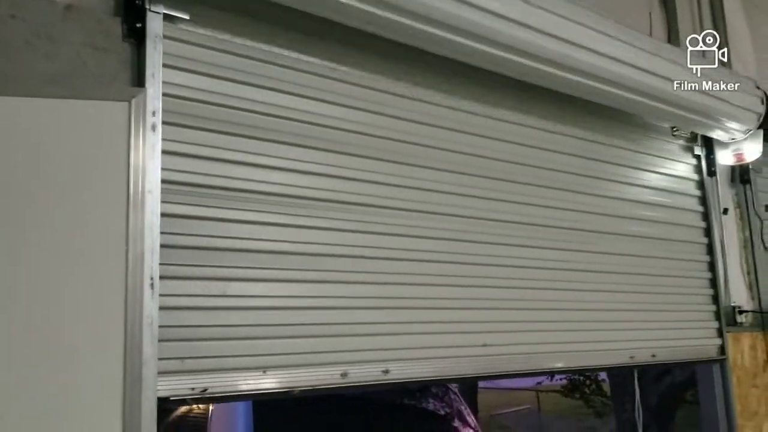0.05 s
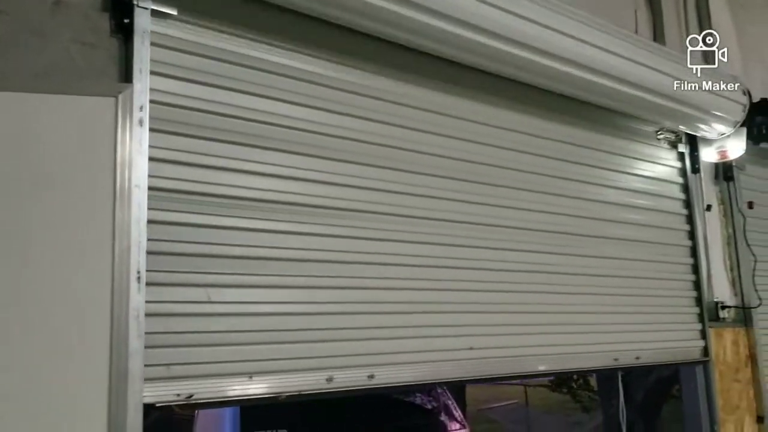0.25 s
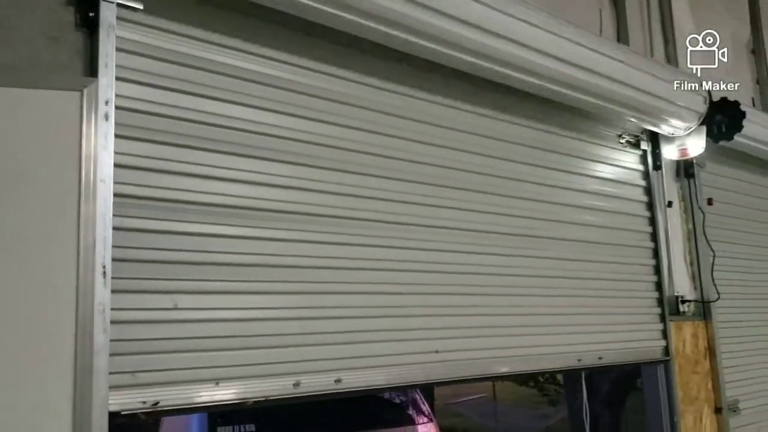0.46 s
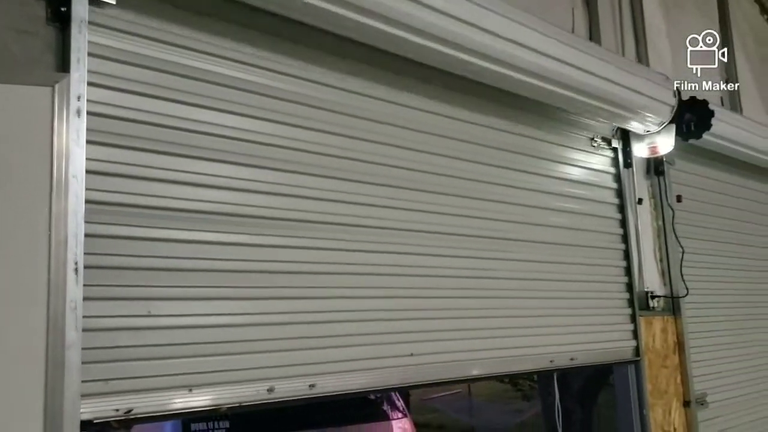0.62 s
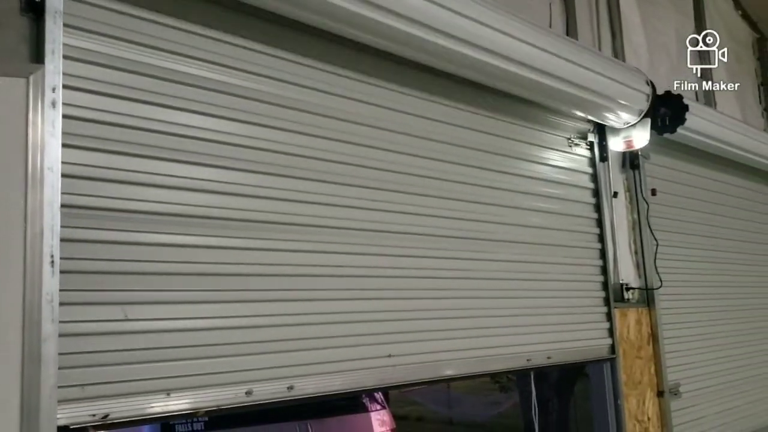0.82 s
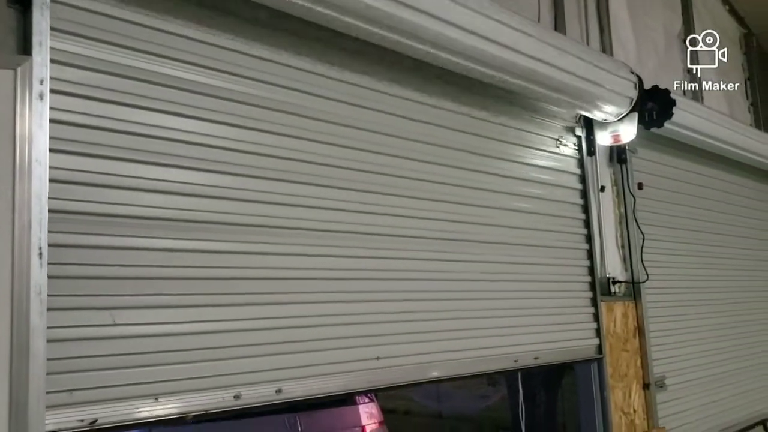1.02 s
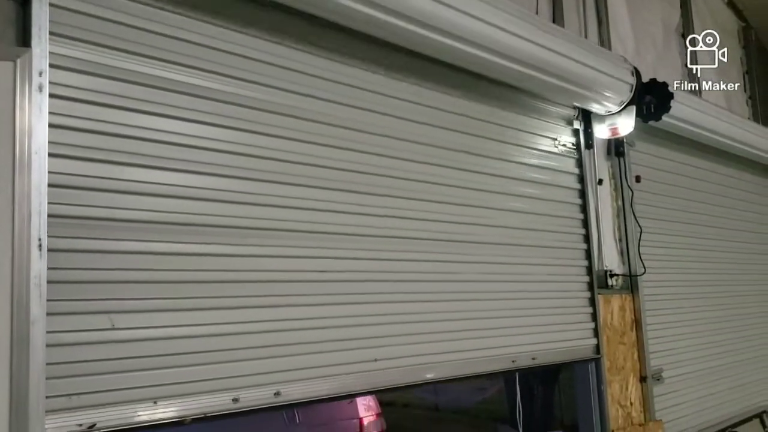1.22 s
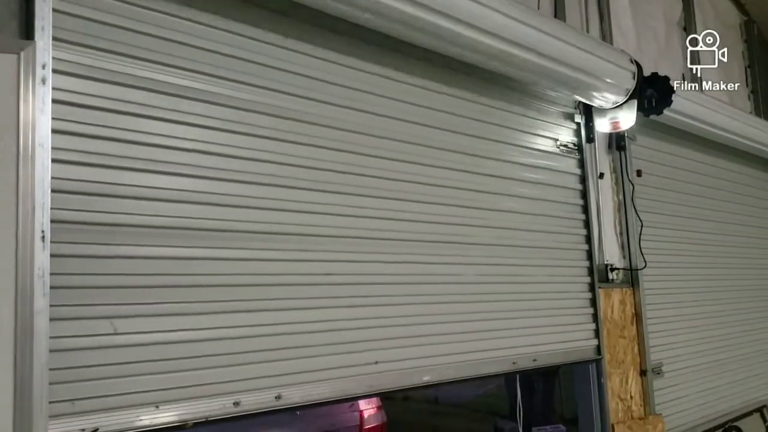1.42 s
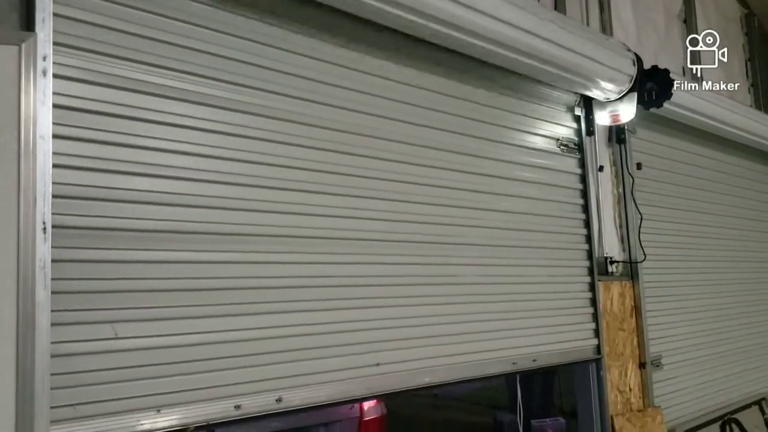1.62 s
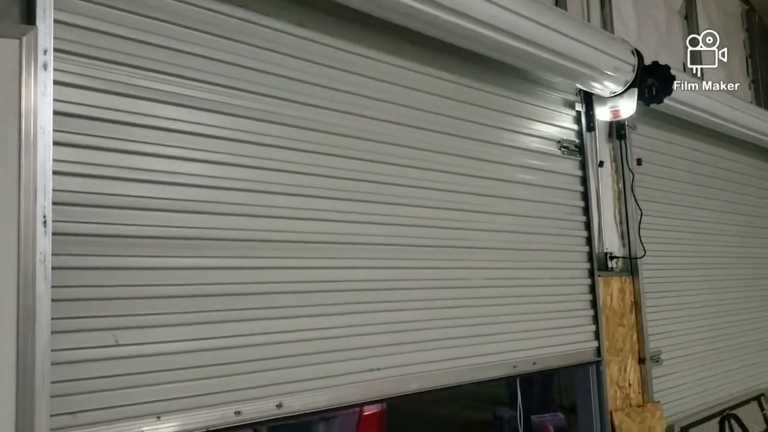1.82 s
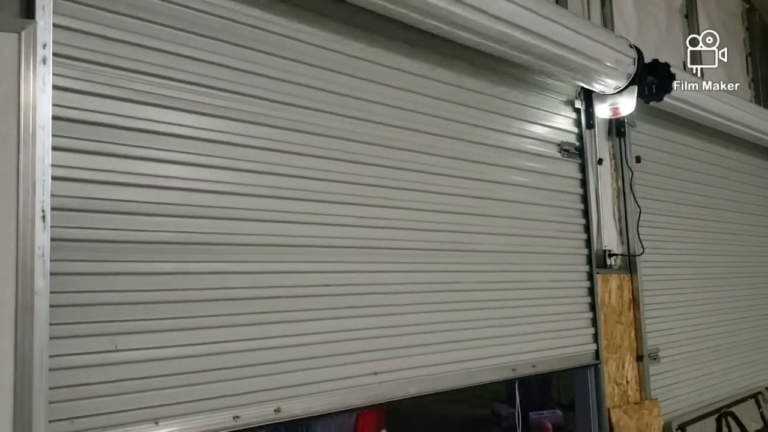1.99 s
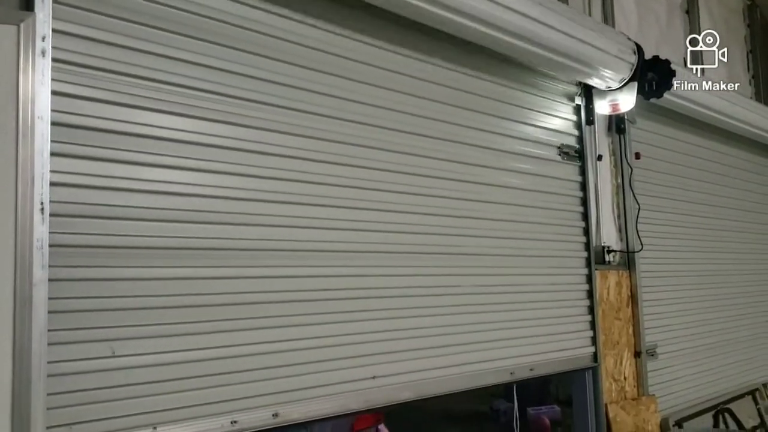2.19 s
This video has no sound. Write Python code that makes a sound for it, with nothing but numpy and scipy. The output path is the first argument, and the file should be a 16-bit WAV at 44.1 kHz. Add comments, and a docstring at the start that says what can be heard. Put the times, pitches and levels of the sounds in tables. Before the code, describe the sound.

A motorised steel roll-up door winds down in an echoing metal garage, a few metres away. The motor hums and rumbles from the start. At about 0.3 seconds the door jerks free with a thump, crash and clang. The slats then knock and rattle while the sheet booms, loudest around 0.5 seconds, with a very faint scrape and squeaks. From about 2 seconds the rattle dies away.

```python
"""A motor winds a steel roll-up door down in a metal garage, heard from a few metres inside.
First the drive hums and rumbles. With a knock and a thump the curtain of slats jerks free and
crashes, and its bottom bar clangs. Then the slats knock and rattle in their guides while the
whole sheet booms, with a faint scrape and a few squeaks. Near the end the rattle dies away
and the hall rings with it."""
import sys
import numpy as np
from scipy import signal
from scipy.fft import rfft, irfft
from scipy.io import wavfile
from scipy.ndimage import uniform_filter1d

SR = 44100
rng = np.random.default_rng(int(sys.argv[2]) if len(sys.argv) > 2 else 0)


def waveform_to_disk(signal):
    """Save audio, clipped to [-1, 1], as 16-bit WAV at the path in sys.argv[1]."""
    frames = np.transpose(np.atleast_2d(signal))
    scaled = np.clip(frames, -1, 1) * 32767
    samples = np.round(scaled).astype(np.int16)
    wavfile.write(sys.argv[1], SR, samples)


N = 103635

# hum of the motor: t/s, f/Hz, level/dB
MOTOR_HUM = [(0, 131.2, -54), (.17, 129.6, -50), (.26, 126.7, -47.5), (.7, 120, -45), (1.0, 149.3, -44.5),
             (1.5, 154, -52.5), (2.0, 151.4, -46), (2.15, 150.2, -50), (2.35, 147.5, -80)]
# how hard the moving curtain shakes: t/s, relative rattle level/dB, relative rumble level/dB
SHAKING = [(0, -46.5, -14.5), (.26, -41, -6), (.285, -4.5, -4.5), (.46, 0.5, 2), (.55, 6, 1.5), (.68, 2, 5),
           (.8, 2, 0.5), (1.03, -1, 1), (1.2, 4, -2), (1.55, -0.5, 2), (1.75, -4, -0.5), (1.87, -2, 0.5),
           (2.08, -10.5, -4), (2.16, -21, -6), (2.35, -28.5, -11)]
# tone colour (how strong each frequency is) of the rumbling drum: f/Hz, relative level/dB
RUMBLE_COLOUR = [(20, -22), (32, -18), (52, -1.5), (59, -8.5), (73, -4.5), (90, -2.5), (120, 1.5),
                 (160, -0.5), (230, -13), (400, -25.5), (900, -42.5), (4000, -83)]
# tone colour of the whirring gears: f/Hz, relative level/dB
WHIRR_COLOUR = [(60, -9.5), (200, 8.5), (380, 1), (500, 5.5), (620, 0), (1000, -3), (1300, -20.5),
                (2000, -27.5), (2800, -36.5), (16000, -73.5)]
# slats knocking against the guides: t/s, relative level/dB
KNOCKS = [(0.182, -23), (.263, 1), (0.28, 5), (0.31, 3), (.324, 3.5), (.357, -0.5), (.388, 0), (.42, -4),
          (.497, 2), (.512, -1), (.529, 4), (.546, -2), (.572, -5.5), (.612, -8), (.659, -7), (.678, -8.5),
          (.722, 1.5), (.744, 2), (.763, -2.5), (.795, -1), (0.894, 2.5), (.925, 0.5), (.958, -4),
          (.985, -8), (1.064, -3), (1.101, 2.5), (1.138, -5), (1.172, -1.5), (1.202, -3), (1.253, 1.5),
          (1.301, -6), (1.358, -8.5), (1.43, 5), (1.439, 0.5), (1.494, 2), (1.518, -5), (1.579, -3.5),
          (1.596, -3), (1.646, -4), (1.686, -4), (1.771, -2.5), (1.834, -3.5), (1.846, -4.5), (1.857, 0.5),
          (1.873, -8), (1.945, -8), (2.018, -7.5), (2.046, -10.5), (2.21, -12.5), (2.302, -13.5),
          (2.324, -13)]
# tone colour of a knock: f/Hz, relative level/dB
KNOCK_COLOUR = [(60, -29.5), (130, -0.5), (200, 4.5), (280, 0), (480, 0.5), (700, -2), (950, -3.5),
                (1400, -12), (1800, -19), (2250, -27.5), (2750, -49), (3700, -50), (4800, -63),
                (16000, -80.5)]
# tones at which the steel slats ring: f/Hz, width/Hz, relative level/dB
SLAT_TONES = [(333, 16, -2), (415, 14, -2), (472, 22, -3), (548, 20, -5), (653, 22, -2), (741, 22, -5),
              (917, 30, -3), (1090, 26, -6), (1392, 40, -4), (1581, 36, -4), (1935, 50, -8), (2259, 24, -4)]
# thumps of the bending sheet: t/s, relative level/dB, main tone f/Hz
THUMPS = [(0.184, -4.5, 139.6), (0.265, 1.5, 155.5), (0.284, 6, 157.4), (0.318, 8.5, 150.2),
          (0.358, 3, 162.9), (0.405, -1, 133), (0.517, 1, 162), (0.574, -4.5, 124.6), (.625, -3.5, 130),
          (0.663, -3.5, 119.9), (.722, 2, 150.8), (.750, 4.5, 150.8), (.776, 0.5, 153),
          (0.813, -3.5, 153.5), (0.896, -1, 146.8), (0.959, -6, 161.6), (1.136, -8, 155.7),
          (1.254, 1.5, 155.7), (1.304, -4, 153.6), (1.448, -1.5, 153.1), (1.505, 1.5, 160),
          (1.525, 0.5, 158), (1.604, -5.5, 150.8), (1.688, -2, 169.3), (1.716, -5.5, 163.5),
          (1.782, -5, 159.5), (1.855, -1, 164.2), (1.878, -7.5, 155), (1.95, -2.5, 155.2),
          (2.017, -10, 157.2), (2.326, -6.5, 144.7)]
# tones of the sheet: ratio to the main tone, time to fade by 60 dB/s, relative level/dB
SHEET_TONES = [(0.482, 0.28, -22), (.79, 0.12, -8.5), (1, 0.13, 2.5), (1.3, 0.18, -4.5)]
# the bottom bar hitting the guides: t/s, relative level/dB, contact time/s
CLANGS = [(0.2611, -2, .0004), (.526, -5.5, 0.0013), (1.849, -8, 0.0011)]
# tones of the bottom bar: f/Hz, time to fade by 60 dB/s, relative level/dB
BAR_TONES = [(206, 0.28, -1), (337, 0.22, -5), (463.8, 0.24, -6.5), (654, 0.14, -6.5), (900.5, 0.063, 2),
             (985, 0.044, -1)]
# blows as the curtain jerks free: t/s, relative level/dB
JERK_BLOWS = [(.2615, 1.5), (.277, -1.5), (.300, -5.5), (.317, -1.5), (.329, 1.5)]
# tone colour of that crash: f/Hz, relative level/dB
CRASH_COLOUR = [(60, -32), (300, 4), (600, -3), (950, -1), (1300, -6), (1700, -8.5), (2050, -12.5),
                (2400, -21.5), (2800, -29), (3900, -36.5), (4600, -50.5), (16000, -79)]
# tone colour of the rattling slats: f/Hz, relative level/dB
RATTLE_COLOUR = [(60, -15.5), (130, 3), (200, 10.5), (280, 6), (480, 6.5), (700, -2.5), (1000, 0),
                 (1400, -11.5), (1800, -16.5), (2250, -26.5), (2750, -70.5), (3700, -55.5), (5000, -60),
                 (16000, -75.5)]
# a slat scraping in its guide: t/s, level/dB
SCRAPE_LEVELS = [(.6, -125), (.68, -86), (.77, -84), (.84, -110), (1.05, -99.5), (1.3, -100.5), (1.4, -120)]
# tone colour of the scrape: f/Hz, relative level/dB
SCRAPE_COLOUR = [(2000, -29), (3300, 3), (3900, 2.5), (4400, -6), (5500, -1), (7500, -25), (16000, -24.5)]
# squeaks of the curtain: middle t/s, half length/s, f/Hz, level before the echoes/dB
SQUEAKS = [(1.05, .07, 3900, -104), (1.26, .1, 3840, -99), (2.22, .08, 1787, -89.5)]
# stereo width, what differs between the ears against what they share: f/Hz, relative level/dB
STEREO_WIDTH = [(30, -14), (70, -18), (150, -20), (260, -11.5), (500, -6), (1000, 2.5), (16000, 1.5)]
# tone colour of the steady hiss: f/Hz, relative level/dB
HISS_COLOUR = [(1000, 2), (3800, -3), (5000, -6), (7000, -11.5), (8800, -13), (10500, -7), (12000, -1),
               (15500, -1.5)]

PLACES = 6  # spots on the curtain that knock and rattle
FILTER_SIZE, ECHO_SIZE = 8192, 32768  # samples


def undb(db):
    """Turn decibels into a factor to multiply by."""
    return 10 ** (np.asarray(db) / 20)


def level(x, db):
    """Scale a sound to an average (rms) level."""
    return x * undb(db) / np.sqrt(np.mean(x ** 2))


def fade(t, t60):
    """A fade that falls by 60 dB every t60 seconds."""
    return np.exp(-np.log(1000) * t / t60)


def pan(x, right_db):
    """Make the right side right_db louder than the left."""
    return x * undb(np.array([[-right_db], [right_db]]) / 2)


def curve(table, column):
    """One column of a table, joined by straight lines in time."""
    rows = np.array(table)
    return np.interp(np.arange(N) / SR, rows[:, 0], rows[:, column])


def gains(points):
    """Join (Hz, dB) points into a gain for every frequency of a filter."""
    hz, db = np.array(points).T
    filter_hz = np.arange(FILTER_SIZE // 2 + 1) * SR / FILTER_SIZE
    return undb(np.interp(np.log(filter_hz + 1), np.log(hz), db))


def convolve(x, response):
    """Play a sound through a filter or room, given its response to one click."""
    return signal.fftconvolve(np.atleast_2d(x), np.atleast_2d(response), axes=-1)[:, :x.shape[-1]]


def shape(x, gain):
    """Filter with the given gains, ringing only after a sound and never before it."""
    one_sided = np.r_[1, np.full(FILTER_SIZE // 2 - 1, 2), np.zeros(FILTER_SIZE // 2)]
    log_spectrum = rfft(irfft(np.log(gain)) * one_sided)
    return convolve(x, irfft(np.exp(log_spectrum)))


def colour(x, points):
    """Give a sound a tone colour of (Hz, dB) points."""
    return shape(x, gains(points))


def wander(rate_hz):
    """A smooth random wobble, about 1 in size."""
    step = int(SR / rate_hz)
    held = np.repeat(rng.standard_normal(200), step)[:N]
    return level(uniform_filter1d(uniform_filter1d(held, step), step), 0)


def wide_noise(size=N):
    """Stereo noise, alike at both ears in the bass and different in the treble."""
    width = gains(STEREO_WIDTH)
    mid, side = (shape(rng.standard_normal(size), share / np.hypot(1, width)) for share in (1, width))
    return np.vstack([mid + side, mid - side])


def hall(splits_hz=(1200, 2700), t60s=(0.63, 0.76, 0.58), build_s=0.0015, early_db=3.5, early_s=0.013):
    """Echoes of the metal garage: strong first echoes, then a tail whose top band dies first."""
    t, noise = np.arange(ECHO_SIZE) / SR, rfft(wide_noise(ECHO_SIZE))
    band = np.digitize(np.arange(noise.shape[1]) * SR / ECHO_SIZE, splits_hz)
    tail = sum(irfft(noise * (band == k)) * fade(t, t60) for k, t60 in enumerate(t60s))
    build_up = 1 - np.exp(-t / build_s)
    early = 1 + undb(early_db) * np.exp(-t / early_s)  # off the door and the nearest wall
    return level(tail * build_up * early, 0) / np.sqrt(ECHO_SIZE)


def drive(shaft_db=-54, waver_db=-2.5):
    """The drum rumbles, the gears whirr, and the motor hums over a shaft tone an octave below."""
    hum_hz = curve(MOTOR_HUM, 1) * (1 + 0.014 * wander(14.49))
    shaft_angle = np.pi * np.cumsum(hum_hz) / SR
    hum = undb(curve(MOTOR_HUM, 2) + waver_db * wander(4.3)) * np.sin(2 * shaft_angle)
    shaft = undb(shaft_db + waver_db * wander(27)) * np.sin(shaft_angle)
    drum = level(colour(wide_noise(), RUMBLE_COLOUR) * undb(curve(SHAKING, 2)), db=-42.5)
    gears = level(colour(wide_noise(), WHIRR_COLOUR), db=-58.5)
    return np.sqrt(2) * (hum + shaft) + drum + gears


def blows(rows, chatter_s, click, chatter_db=-5, rise_s=0.0017):
    """The force of each blow: a click, then a short chatter of the slats next to it."""
    force, t = np.zeros(N), np.arange(SR // 5) / SR
    chatter_size = undb(chatter_db) * np.exp(-t / chatter_s) * (1 - np.exp(-t / rise_s))
    for at, db in rows:
        blow = chatter_size * rng.standard_normal(len(t))
        blow[0] += click
        cutoff_hz = np.clip(3000 * undb(db) ** 0.93, 500, SR / 4)  # gentle blows are duller
        blow = signal.lfilter(*signal.butter(1, cutoff_hz, fs=SR), blow)
        start = int(at * SR)
        force[start:start + len(t)] += undb(db) * blow[:N - start]
    return force


def slats(force, tone_colour, detune=0.024, hall_db=6):
    """Blows make the slats ring into the hall, at slightly different pitches for each spot."""
    shifts = 1 + detune * rng.standard_normal(len(SLAT_TONES))
    ring = sum(undb(db) * signal.lfilter(*signal.iirpeak(hz * shift, hz / width, SR), force)
               for (hz, width, db), shift in zip(SLAT_TONES, shifts))
    direct = colour(force + ring, tone_colour)
    return pan(direct + undb(hall_db) * convolve(direct, hall()), right_db=2.5)


def knocks():
    """Slats knock against the guides, at several spots in turn."""
    forces = (blows(KNOCKS[k::PLACES], chatter_s=0.009, click=0.21) for k in range(PLACES))
    return level(sum(slats(force, KNOCK_COLOUR) for force in forces), db=-41.5)


def sheet_boom(push_s=0.0072):
    """The whole sheet bends and booms at a pitch that depends on where it is pushed."""
    out, t = np.zeros(N), np.arange(SR // 2) / SR
    swell = (1 - np.exp(-t / push_s)) ** 2
    for at, db, hz in THUMPS:
        ring = sum(undb(tone_db) * np.sin(2 * np.pi * hz * ratio * t) * fade(t, t60)
                   for ratio, t60, tone_db in SHEET_TONES)
        start = int(at * SR)
        out[start:start + len(t)] += undb(db) * (ring * swell)[:N - start]
    return level(out, db=-41)


def bar_clangs(gain_db=-27, attack_s=0.001, hall_db=-7):
    """The bottom bar hits the guides and clangs; a longer contact leaves only its low, hollow tones."""
    out = 0
    for at, db, contact_s in CLANGS:
        t = np.maximum(np.arange(N) / SR - at, 0)
        attack = 1 - np.exp(-t / attack_s)
        for hz, t60, tone_db in BAR_TONES:
            size = undb(gain_db + db + tone_db) / (1 + (hz * contact_s) ** 6)
            out = out + size * np.sin(2 * np.pi * hz * t) * fade(t, t60) * attack
    return pan(out + undb(hall_db) * convolve(out, hall()), right_db=3)


def jerk():
    """The slack curtain pulls tight with a crash, harder and brighter than the knocks."""
    force = blows(JERK_BLOWS, chatter_s=0.0048, click=0.26)
    return level(slats(force, CRASH_COLOUR), db=-47.5)


def rattle(hits_per_s=260, spread_db=6.5):
    """Many small, uneven taps as the slats slide and hinge at several spots on the curtain."""
    out, shaking = 0, undb(curve(SHAKING, 1))
    for _ in range(PLACES):
        hits = rng.random(N) < hits_per_s / PLACES / SR
        sizes = undb(spread_db * np.clip(rng.standard_normal(N), -2, 2))
        directions = np.sign(rng.random(N) - .5)
        out = out + slats(hits * sizes * directions * shaking, RATTLE_COLOUR)
    return level(out, db=-44.5)


def scrape():
    """The curtain's edge rubs in its guide with a thin, faint noise."""
    rubbing = level(colour(rng.standard_normal((2, N)), SCRAPE_COLOUR), 0)
    return rubbing * undb(curve(SCRAPE_LEVELS, 1))


def squeaks(waver=0.006):
    """The moving curtain squeaks faintly: thin, wavering tones swell and fade in the hall."""
    tones, t = 0, np.arange(N) / SR
    for at, half_s, hz, db in SQUEAKS:
        swell = undb(db) * np.exp(-((t - at) / half_s) ** 2)
        pitch_hz = hz * (1 + waver * wander(60))
        tones = tones + swell * np.sin(2 * np.pi * np.cumsum(pitch_hz) / SR)
    return convolve(tones, hall())


def scene():
    """The drive and all the parts of the door sound together in the garage."""
    return drive() + knocks() + sheet_boom() + bar_clangs() + jerk() + rattle() + scrape() + squeaks()


def record(dry, top_hz=15700):
    """The phone's microphone adds a faint hiss and cuts the highest treble."""
    hiss = level(colour(rng.standard_normal((2, N)), HISS_COLOUR), db=-77.5)
    treble_cut = signal.ellip(10, .2, 80, top_hz, fs=SR, output="sos")
    return signal.sosfilt(treble_cut, dry + pan(hiss, right_db=-1.5))


dry = scene()
out = record(dry)
waveform_to_disk(out)
```